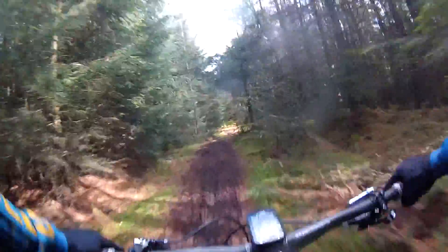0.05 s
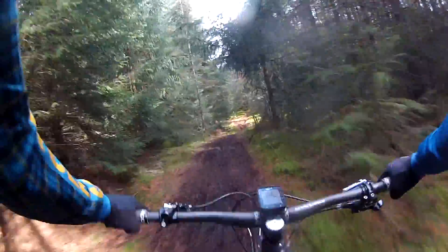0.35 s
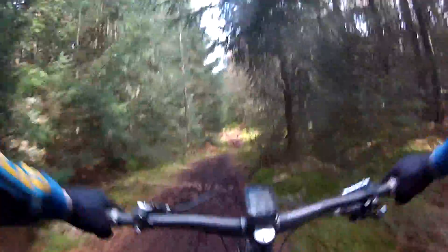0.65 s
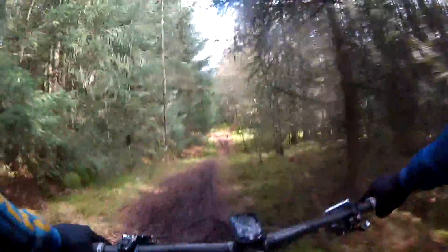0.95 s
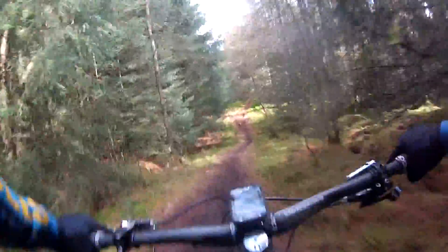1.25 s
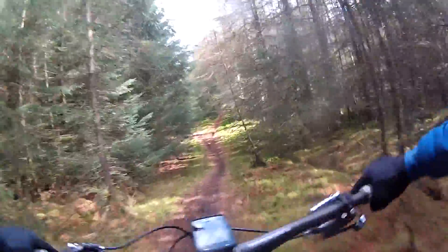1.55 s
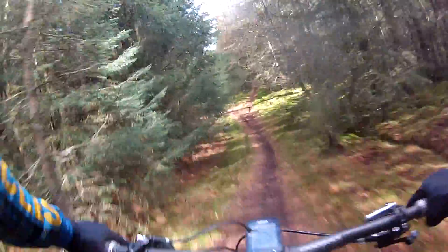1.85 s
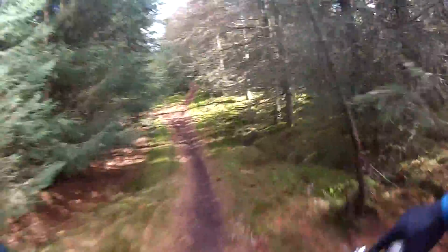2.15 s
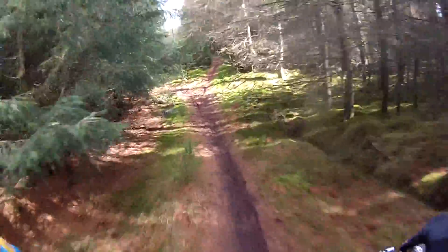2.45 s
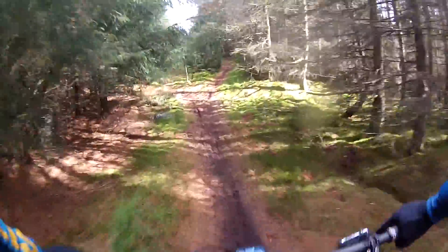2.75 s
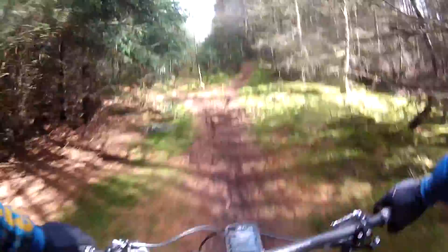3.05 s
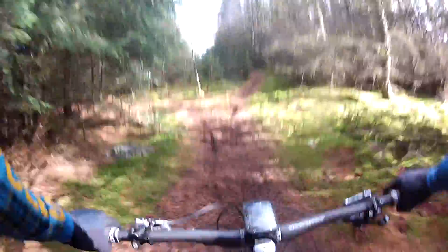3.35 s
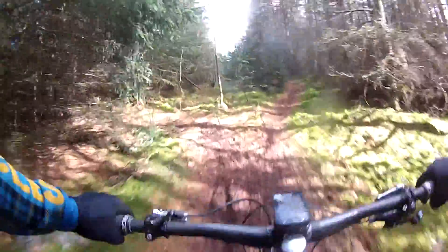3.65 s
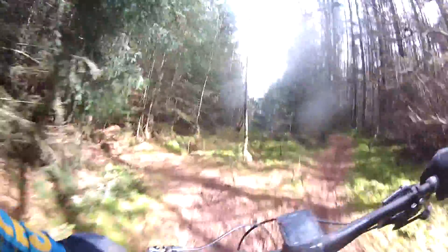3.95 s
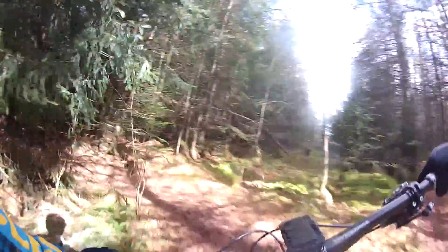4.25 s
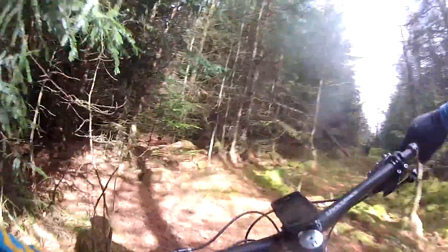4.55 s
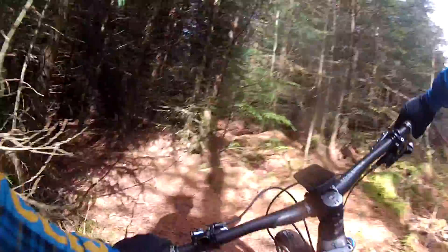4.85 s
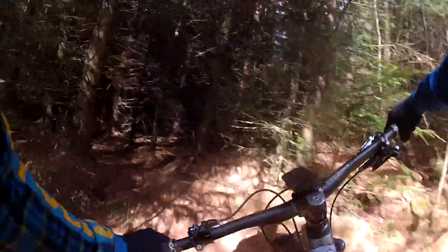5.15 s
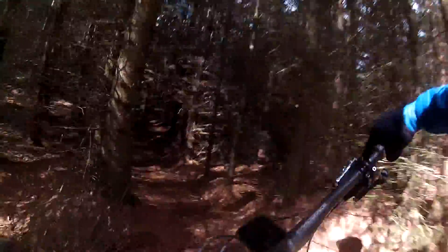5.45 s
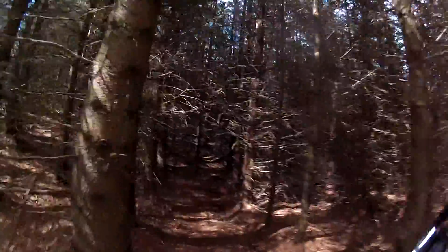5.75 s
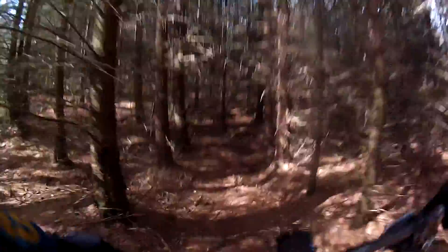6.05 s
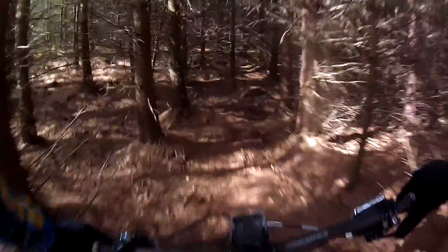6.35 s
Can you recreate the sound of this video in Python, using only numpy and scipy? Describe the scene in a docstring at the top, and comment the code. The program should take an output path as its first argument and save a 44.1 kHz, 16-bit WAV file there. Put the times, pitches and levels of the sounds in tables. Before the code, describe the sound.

A mountain bike runs down a muddy trail, rumbling and rattling close up, with tyre scuffs and knocks over roots.

```python
"""A muddy forest trail, heard from a camera case on a rider as the mountain bike runs downhill.
Rough ground rumbles through the frame; the tyres drone, crunch over dirt and scuff in short hissing rushes.
A soft low thump keeps a steady beat, and dips in the trail add slower jolts.
On top, loose parts tick against the case and roots knock the frame. All of it is close and dry."""
import sys
import numpy as np
from scipy import signal
from scipy.fft import rfft, irfft
from scipy.io import wavfile

SR = 44100
rng = np.random.default_rng(int(sys.argv[2]) if len(sys.argv) > 2 else 0)


def inscribe(sig):
    """Save sig as 16-bit PCM at rate SR to the path in sys.argv[1].

    A 1-D sig is mono; a 2-D sig holds one channel per row.
    Samples are clipped to [-1, 1] before scaling.
    """
    pcm = np.round(np.clip(np.atleast_2d(sig).T, -1, 1) * 32767)
    wavfile.write(sys.argv[1], SR, pcm.astype(np.int16))


N = 291942
TIME = np.arange(N) / SR
BINS = np.fft.rfftfreq(N, 1 / SR)

# Levels in the tables are relative: each layer has its own trim.
# Roughness of the trail, felt in frame and tread: t/s, rumble/dB, drone/dB
ROUGHNESS = [(0.0, -33.5, -41.5), (0.24, -36.5, -37.5), (0.51, -28.5, -41.5), (0.74, -36, -36.5),
             (1.18, -33, -42), (1.44, -37.5, -43), (1.62, -37, -47), (2.04, -30, -41.5), (2.25, -37.5, -50),
             (2.75, -35.5, -42), (2.91, -25, -44.5), (3.19, -27, -42), (3.45, -21.5, -44),
             (3.69, -38.5, -45), (3.93, -38, -50), (4.11, -34, -42), (4.31, -35.5, -60), (4.68, -42, -61),
             (4.94, -39, -56), (5.96, -36.5, -53), (6.12, -40.5, -51), (6.34, -43, -48.5),
             (6.51, -34.5, -57), (6.62, -42.5, -65)]
# EQ curve of the shaking frame: f/Hz, level/dB
RUMBLE_EQ = [(8, -12), (17, 3.5), (35, -3.5), (55, -16), (85, -14.5), (130, -23), (220, -48), (500, -44.5),
             (1500, -100)]
# EQ curve of the droning tread: f/Hz, level/dB
DRONE_EQ = [(50, -4.5), (100, -3), (145, -4), (188, 1.5), (230, -8), (290, -17), (400, -25.5), (600, -39),
            (1200, -33), (3000, -100)]
# How hard the rolling tyres work the dirt: t/s, crunch/dB, hiss/dB
TYRE_WORK = [(0.0, -53, -47.5), (0.24, -55.5, -47.5), (0.57, -48, -43), (0.88, -48.5, -41.5),
             (1.23, -54.5, -50), (1.75, -57.5, -49.5), (1.99, -52, -55.5), (2.27, -53, -50),
             (2.45, -55.5, -54.5), (2.65, -55, -59), (3.13, -49, -51), (3.37, -47.5, -46), (3.61, -56, -54),
             (3.8, -62, -60), (4.13, -51, -50), (4.41, -61.5, -57.5), (4.66, -59.5, -65),
             (4.98, -60, -57.5), (5.12, -54.5, -61), (5.36, -60.5, -57), (5.62, -54.5, -55),
             (5.9, -61.5, -60), (6.29, -61, -56), (6.62, -60.5, -65)]
# EQ curve of crunching dirt: f/Hz, level/dB
CRUNCH_EQ = [(150, 6), (330, 6.5), (520, -9), (700, -3.5), (1050, 1.5), (1380, 4), (1600, -3), (1980, 1.5),
             (2850, -3.5), (3500, -16.5), (4400, -13.5), (6100, -24), (9000, -14.5), (15000, -18.5)]
# Case resonances that colour the tyre hiss: f/Hz, width/Hz, level/dB
HISS_BANDS = [(1130, 660, 1), (1940, 470, 1), (2460, 1120, -4), (3536, 820, 0.5), (5120, 720, -18),
              (6700, 720, -21.5), (8510, 830, -7), (9750, 680, -9.5), (10560, 330, -10), (13200, 630, -22),
              (14000, 270, -8), (15100, 550, -15)]
# Fader curve of the steady beat: t/s, level/dB
BEAT_FADER = [(0, -17), (0.32, -21.5), (0.92, -12.5), (1.3, -18.5), (1.53, -17), (1.85, -12.5), (2.15, -13),
              (2.76, -19), (3.97, -18.5), (4.28, -11), (4.9, -16.5), (5.8, -17.5), (6.62, -20)]
# Loose parts hitting the case, some twice; lean tips the 3.5 kHz snap towards the 2 kHz ping:
# t/s, level/dB, lean/dB
CASE_TICKS = [(0.0888, -10.5, 4.5), (0.1374, -4.5, 4.5), (0.2066, -11.5, 2), (0.2602, -10.5, 0),
              (0.264, -12.5, 14.5), (0.3522, -12.5, -0.5), (0.4853, -2.5, 3), (0.4973, -22, 18),
              (0.5291, -5.5, 3.5), (0.57, -1, 0.5), (0.7713, -12, 5), (0.7809, -3.5, -2.5),
              (0.8441, -12, 10), (0.86, -15.5, 16), (0.8943, -4.5, 6), (0.8979, -11, 18),
              (0.9042, -13.5, 13), (1.0056, -3, -0.5), (1.053, -15.5, 18.5), (1.1072, -6.5, -1),
              (1.1488, -22, 9), (1.2164, -16, 12), (1.2354, -18.5, 3), (1.317, -3.5, 4), (1.3977, -5, -1),
              (1.4532, -6.5, -1), (1.5127, -8, -0.5), (1.5404, -2, 1), (1.6867, -12, 3.5),
              (1.7506, -24.5, 14), (1.8019, -19, -2), (1.8095, -14.5, -2.5), (1.8422, -10, 7.5),
              (1.8472, -14, 9), (1.914, -18, 11), (1.978, -6.5, 1), (2.0607, -11.5, 10), (2.2846, -5, 1.5),
              (2.3638, -21, 10), (2.387, -23, 7), (2.428, -23.5, 4), (2.6755, -13, -0.5), (2.764, -13, 4),
              (2.8838, -8.5, 5), (2.9219, -6, -5.5), (2.9422, -13.5, 7), (2.9503, -20, 20), (2.99, -8.5, 5),
              (3.0567, -4, -3), (3.1548, -4, 5.5), (3.213, -19, 10.5), (3.2683, -3.5, -0.5),
              (3.3238, -6.5, 1), (3.3839, 0.5, -1.5), (3.412, -23, 16), (3.4442, -10.5, 10),
              (3.4568, -4, 5.5), (3.5133, -8, 4), (3.5166, -4, 1.5), (3.828, -29.5, 5), (3.9603, -5.5, -2),
              (4.1458, -12, 4), (4.1938, -7, 2), (4.243, -27, 11), (4.295, -24, 4), (4.3367, -30.5, 17),
              (4.7119, -19.5, 4), (4.8193, -10.5, 7.5), (4.8625, -12, 5.5), (4.867, -17.5, 14),
              (4.917, -22, 4), (5.0229, -21.5, 13), (5.0586, -24, 5), (5.068, -21.5, 20), (5.1643, -25, 11),
              (5.26, -20, 9), (5.263, -26.5, 17), (5.2907, -20.5, 0), (5.3, -18, 17), (5.4081, -19.5, 4),
              (5.4441, -14.5, 7.5), (5.501, -12, 3.5), (6.1113, -14.5, 5.5), (6.1438, -9.5, 6),
              (6.402, -21.5, 5), (6.428, -4.5, 3.5), (6.5007, -10.5, 3), (6.5276, -23.5, 4)]
# Ringing modes of the case: f/Hz, level/dB, decay/s
CASE_MODES = [(770, -14, 0.00079), (1470, -15.5, 0.0046), (2027, -12.5, 0.0053), (2255, -19, 0.014),
              (3203, -21, 0.022), (3463, -9, 0.0049), (4617, -18.5, 0.0072), (5060, -23, 0.0073),
              (6800, -29, 0.011), (7335, -24, 0.0077), (8480, -17, 0.0052), (9720, -25, 0.0098),
              (10030, -30.5, 0.022), (10880, -35, 0.011), (14300, -31, 0.0095), (14230, -24, 0.0038),
              (14700, -31, .006)]
# Tyres scuffing and sliding: t/s, length/s, crunch/dB, hiss/dB
TYRE_SCUFFS = [(0.13, 0.036, -43, -48), (0.235, 0.012, -50, -52), (0.347, 0.079, -55, -38.5),
               (0.675, 0.056, -41, -42.5), (0.775, 0.034, -42, -37), (1.007, 0.078, -60, -50),
               (1.551, 0.028, -40.5, -43.5), (1.825, 0.013, -46, -35.5), (1.887, 0.029, -42, -39.5),
               (1.96, 0.061, -42, -47), (2.136, 0.105, -61, -46.5), (2.74, 0.054, -50, -51),
               (2.922, 0.047, -46, -50), (3.068, 0.02, -49, -50), (3.714, 0.196, -62, -64.5),
               (3.866, 0.033, -45, -55), (4.08, 0.04, -47, -55), (4.574, 0.057, -51.5, -58),
               (4.708, 0.11, -47, -43.5), (5.045, 0.078, -51, -47), (5.358, 0.096, -46.5, -53.5),
               (5.507, 0.036, -39.5, -45.5), (5.603, 0.089, -49, -50), (5.686, 0.053, -51, -42.5),
               (5.748, 0.057, -45, -41.5), (5.912, 0.033, -43, -52), (6.036, 0.086, -46.5, -59),
               (6.152, 0.061, -48, -47), (6.25, 0.083, -48.5, -51), (6.51, 0.029, -40, -49)]
# Roots striking the bike: t/s, clack/dB, boom/dB
ROOT_HITS = [(0.221, -40, -10.5), (0.6061, -12.5, -10.5), (0.671, -28, -20), (0.8098, -1, -4),
             (0.8682, -25, -4), (1.0033, -40, -15.5), (1.106, -25, -15), (1.4512, -1.5, -3.5),
             (1.54, -28, -12.5), (3.2409, -16.5, -14.5), (3.266, -14, -7.5), (3.3315, -3, -1),
             (3.455, -15.5, -10.5), (4.794, -27, -16), (5.144, -24, -18), (5.681, -31, -15),
             (5.784, -35, -17.5), (6.4712, -22.5, -19.5), (6.528, -37, -18)]
# Ringing modes of the frame: f/Hz, level/dB, decay/s
FRAME_MODES = [(190, -9.5, 0.017), (300, -25.5, 0.037), (446, -27.5, 0.046), (832, -24, 0.02),
               (1056, -9, 0.007), (1208, -23, 0.021), (1260, -23, 0.0042), (1770, -19, 0.0049),
               (3450, -37, 0.0049)]
# Dips that jolt bike and rider: t/s, level/dB, f/Hz
TRAIL_DIPS = [(0.497, -16, 24), (0.558, -14, 20.6), (0.846, -13, 29.7), (2.488, -20, 28),
              (3.056, -14, 34.3), (3.337, -18, 30), (3.42, -12, 21.5)]


def gain_of(db):
    """Decibels to amplitude."""
    return 10 ** (np.asarray(db) / 20)


def unit_rms(x):
    """Normalises to rms 1."""
    return x / np.sqrt(np.mean(x ** 2) + 1e-20)


def fader(table, column):
    """One dB column of a curve table as a gain for every sample."""
    rows = np.asarray(table)
    return gain_of(np.interp(TIME, rows[:, 0], rows[:, column]))


def eq(points):
    """An EQ curve as a gain for every frequency bin."""
    hz, db = np.transpose(points)
    return gain_of(np.interp(np.log(BINS + 1), np.log(hz), db))


def coloured(x, gains):
    """Filters x and normalises it to rms 1."""
    return unit_rms(irfft(rfft(x) * gains, N))


def flutter(rate_hz):
    """Random wavering of rms 1, up to about the given rate."""
    return coloured(rng.standard_normal(N), 1 / (1 + (BINS / rate_hz) ** 4))


def grains(per_s, spread_db):
    """Sparse clicks of random sign: many small, a few large."""
    size = gain_of(spread_db * np.minimum(rng.exponential(1, N), 4))
    return size * rng.choice([-1, 1], N) * (rng.random(N) < per_s / SR)


def add(mix, s, sound):
    """Mixes a sound in at time s."""
    start = round(s * SR)
    part = mix[max(start, 0):][:len(sound) + min(start, 0)]
    part += sound[max(-start, 0):][:len(part)]


def rumble(rumble_db=3.5, drone_db=4.0, scuff_db=-2, lumpy_db=3.5):
    """The low bed: the ground shakes bike and rider, and the tread drones, more so in a scuff."""
    shaking = fader(ROUGHNESS, column=1) * coloured(rng.standard_normal(N), eq(RUMBLE_EQ))
    tread = np.hypot(gain_of(drone_db) * fader(ROUGHNESS, column=2), gain_of(scuff_db) * scuffs(column=2))
    drone = tread * coloured(rng.standard_normal(N), eq(DRONE_EQ))
    return gain_of(rumble_db) * shaking + drone * gain_of(lumpy_db * flutter(rate_hz=27))


def tyre_crunch(waver, roll_db=3.5, scuff_db=-3.3, grit_db=-6, waver_db=3.0):
    """Crumbs of dirt crunch under the rolling tread and surge in a scuff."""
    rolling = gain_of(roll_db) * fader(TYRE_WORK, column=1)
    envelope = np.hypot(rolling, gain_of(scuff_db) * scuffs(column=2))
    crumbs = rng.standard_normal(N) + gain_of(grit_db) * unit_rms(grains(per_s=1300, spread_db=2.0))
    return coloured(crumbs, eq(CRUNCH_EQ)) * envelope * gain_of(waver_db * waver)


def tyre_hiss(waver, roll_db=-4.0, scuff_db=0.46, rasp=1.2, waver_db=2.66):
    """Rolling and scuffing tyres hiss through the resonances of the case; fine grit makes it rasp."""
    rolling = gain_of(roll_db) * fader(TYRE_WORK, column=2)
    envelope = np.hypot(rolling, gain_of(scuff_db) * scuffs(column=3))
    power = sum(gain_of(db) ** 2 / (1 + (2 * (BINS - hz) / width) ** 2) ** 3
                for hz, width, db in HISS_BANDS)
    spray = rng.standard_normal(N) + rasp * unit_rms(grains(per_s=2000, spread_db=3.0))
    return coloured(spray, np.sqrt(power)) * envelope * gain_of(waver_db * waver)


def thump(s, db, hz, cycles):
    """A push and rebound of little more than one swing, centred on s: returns start time and sound."""
    t = np.arange(-SR // 8, SR // 8) / SR
    swell = 1 / np.cosh(2 * hz * t / cycles)
    swing = np.cos(2 * np.pi * hz * t)
    return s + t[0], gain_of(db) * swell * (swing - np.average(swing, weights=swell))  # no net push


def beat(first_s=0.011, period_s=0.305, pitch_hz=44.8, detune=0.097, trim_db=-1):
    """A soft, steady thump, perhaps the rider's pulse under the camera strap."""
    out = np.zeros(N)
    for s in np.arange(first_s, N / SR, period_s):
        hz = pitch_hz * (1 + detune * rng.standard_normal())
        db = np.interp(s, *np.transpose(BEAT_FADER))
        add(out, *thump(s, trim_db + db, hz, cycles=0.57))
    return out


def ring(modes, extra_db, tuning, mute_s, crack=0.058, tail=0.083):
    """Modes open with a small crack and swell as the blow spreads; settling parts choke them to a tail."""
    hz, db, decay_s = np.transpose(modes)
    t = np.arange(SR // 16) / SR
    age = np.log(1000) * t / decay_s[:, None]
    tones = (age + crack) * np.exp(1 - age) * np.sin(2 * np.pi * (hz * tuning)[:, None] * t)
    choke = tail + (1 - tail) * np.exp(-(t / mute_s) ** 2)
    return gain_of(db + extra_db) @ tones * choke


def chatter(trim_db=-8, ping_db=6):
    """Faint random pings of the case fill in the rattle, stronger where the tyres work harder."""
    taps = grains(per_s=25, spread_db=3)
    hz = np.asarray(CASE_MODES)[:, 0]
    is_ping = (hz > 1700) & (hz < 2700)
    ping = ring(CASE_MODES, ping_db * is_ping, tuning=0.93, mute_s=0.0054)
    pings = signal.oaconvolve(taps, ping)[:N]
    return gain_of(trim_db) * fader(TYRE_WORK, column=2) * unit_rms(pings)


def rattle(trim_db=-0.5, vary_db=2.0, detune=0.022, mute_s=0.0042, linger=0.075):
    """Loose parts tick on the case: hard hits snap short, glancing ones ping and linger."""
    out, hz = np.zeros(N), np.asarray(CASE_MODES)[:, 0]
    is_ping = (hz > 1700) & (hz < 2700)
    tilt = np.where(hz > 6000, 0, np.where(is_ping, 0.5, -0.5))  # lean leaves the top modes' level alone
    for s, db, lean_db in CASE_TICKS:
        colour_db = tilt * lean_db + vary_db * rng.standard_normal(len(hz))
        tuning = 1 + detune * rng.standard_normal(len(hz))
        add(out, s, ring(CASE_MODES, db + colour_db, tuning, mute_s * gain_of(linger * lean_db)))
    return gain_of(trim_db) * out


def scuffs(column, attack_s=0.027, release_s=0.013):
    """Scuff envelope from one dB column: each swells, holds while the tyre slides and dies as it grips."""
    out = np.zeros(N)
    for row in TYRE_SCUFFS:
        age, length_s = TIME - row[0], row[1]
        attack = np.clip(age / attack_s, 0, 1)
        release = np.exp(-np.maximum(age - length_s, 0) / release_s)
        out += gain_of(row[column]) * attack * release
    return out


def root_knocks(trim_db=-2.0, detune=0.051, case_db=-9):
    """Roots strike through the frame: a clack near 1 kHz over a short boom, plus a crack from the case."""
    out, is_boom = np.zeros(N), np.asarray(FRAME_MODES)[:, 0] < 600
    low_case_modes = [mode for mode in CASE_MODES if mode[0] < 2700]
    for s, clack_db, boom_db in ROOT_HITS:
        tuning = 1 + detune * rng.standard_normal(len(FRAME_MODES))
        add(out, s, ring(FRAME_MODES, np.where(is_boom, boom_db, clack_db), tuning, mute_s=0.017))
        add(out, s, ring(low_case_modes, clack_db + case_db, tuning=0.95, mute_s=0.0014))
    return gain_of(trim_db) * out


def jolts(trim_db=-1):
    """Dips in the trail heave bike and rider in slow sub-bass thumps."""
    out = np.zeros(N)
    for s, db, hz in TRAIL_DIPS:
        add(out, *thump(s, trim_db + db, hz, cycles=0.93))
    return out


def scene(fade_in_s=0.01):
    """A close, dry mono mix: the forest floor gives nothing back."""
    hits = rattle() + chatter() + root_knocks()
    thumps = (beat() + jolts()) * np.minimum(TIME / fade_in_s, 1)
    bed = rumble()
    waver = flutter(rate_hz=33.5)  # crunch and hiss flicker together
    return (hits + thumps + bed + tyre_crunch(waver) + tyre_hiss(waver))[None]


def record(dry, dip_db=-8, dip_hz=12000, dip_width_hz=1000, whine_db=-29, whine_hz=12000, top_hz=15400):
    """The case muffles a high band, where a thin whine rides on the bass; a steep low-pass cuts the top."""
    dip = gain_of(dip_db * np.exp(-((BINS - dip_hz) / dip_width_hz) ** 2))
    muffled = irfft(rfft(dry) * dip, N)
    bass = signal.sosfilt(signal.butter(1, [120, 330], "band", fs=SR, output="sos"), dry)
    whine = bass * np.cos(2 * np.pi * whine_hz * TIME)
    low_pass = signal.firwin(511, top_hz, window=("kaiser", 7), fs=SR)
    return signal.oaconvolve(muffled + gain_of(whine_db) * whine, low_pass[None], "same")


dry = scene()
out = record(dry)
inscribe(out)
```